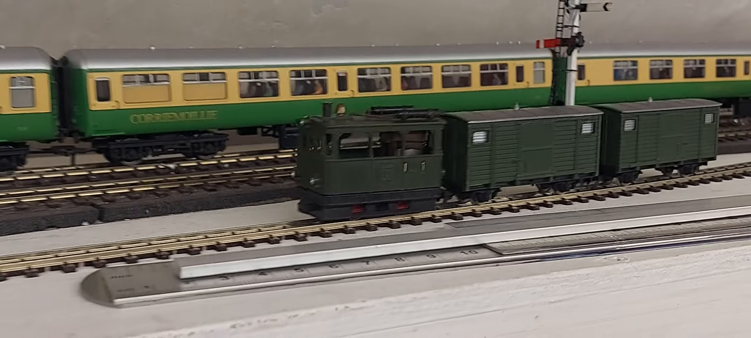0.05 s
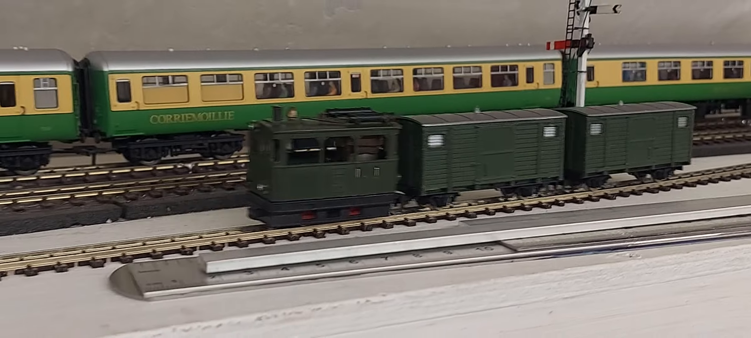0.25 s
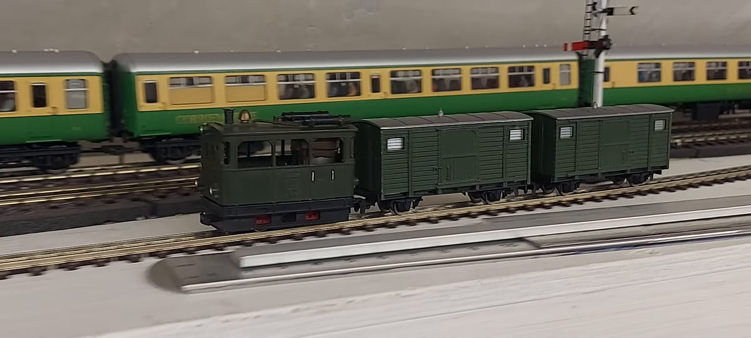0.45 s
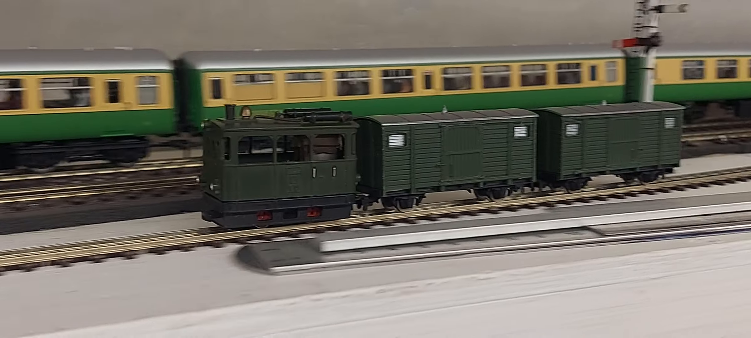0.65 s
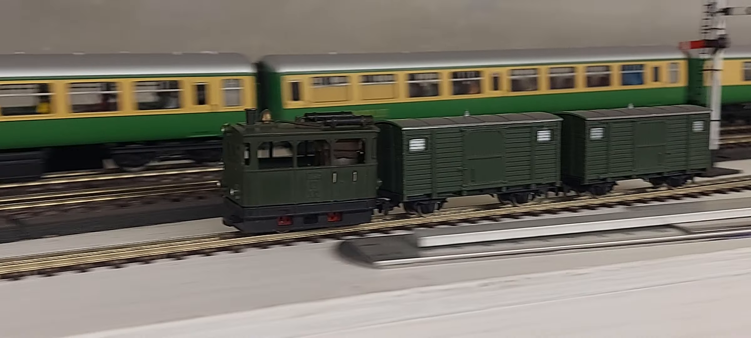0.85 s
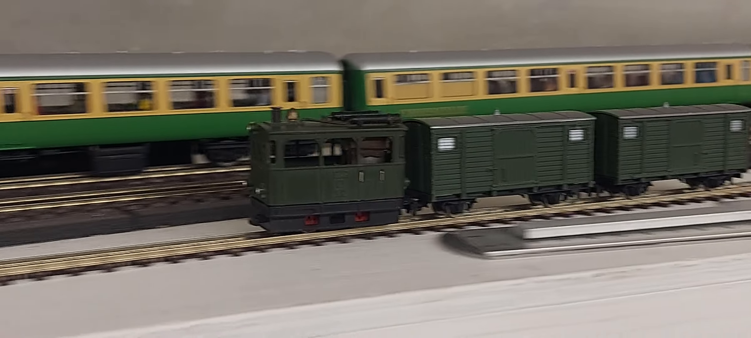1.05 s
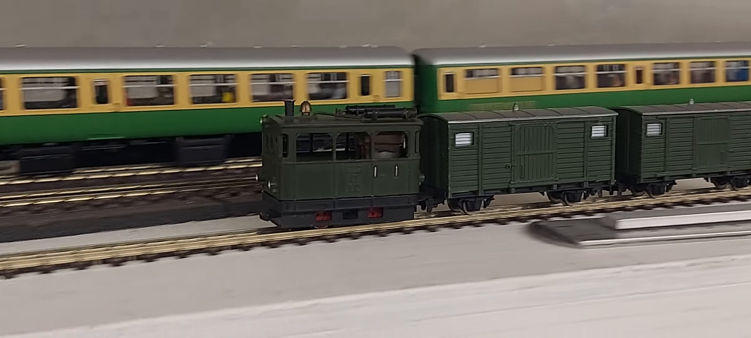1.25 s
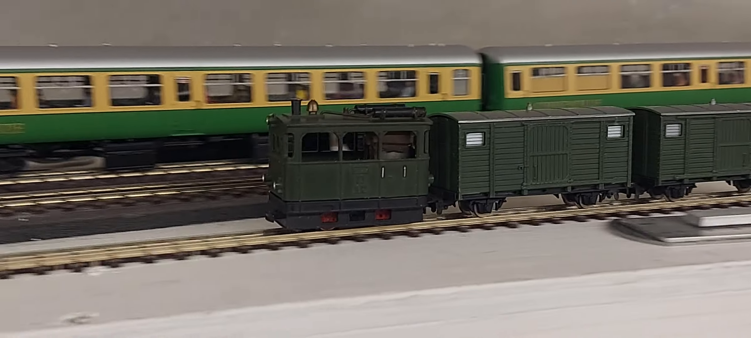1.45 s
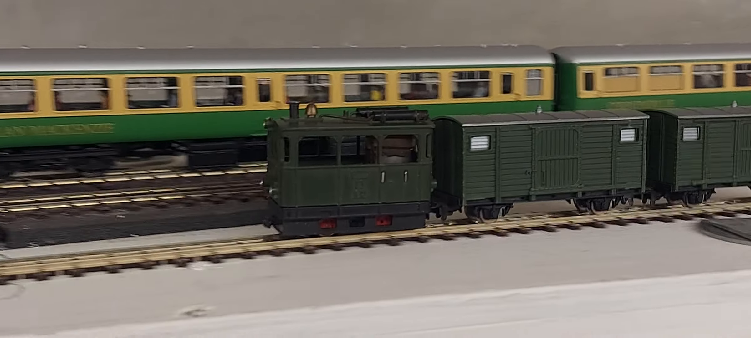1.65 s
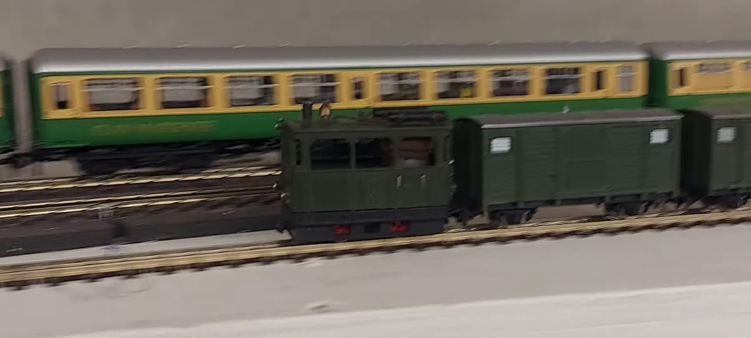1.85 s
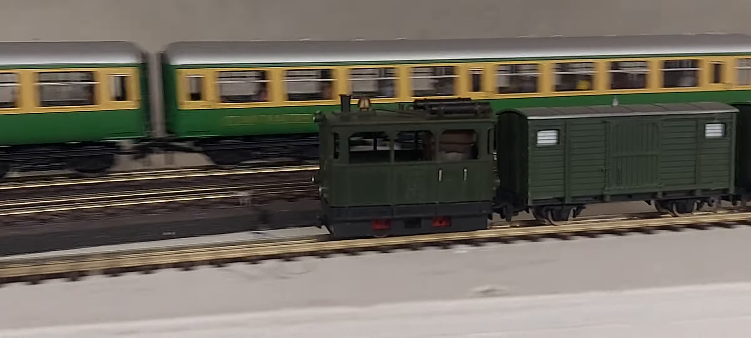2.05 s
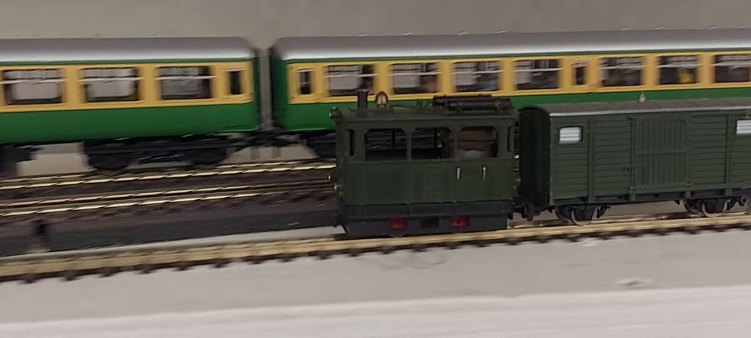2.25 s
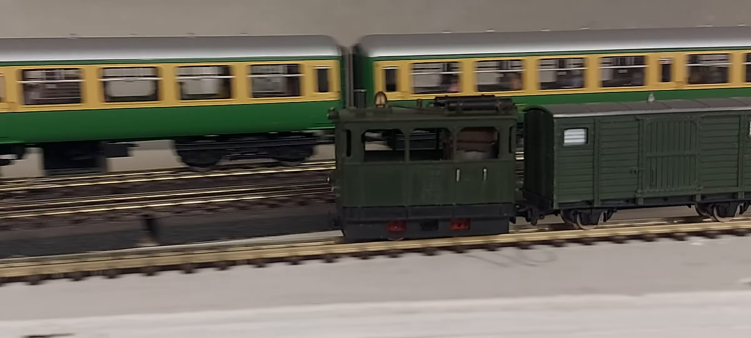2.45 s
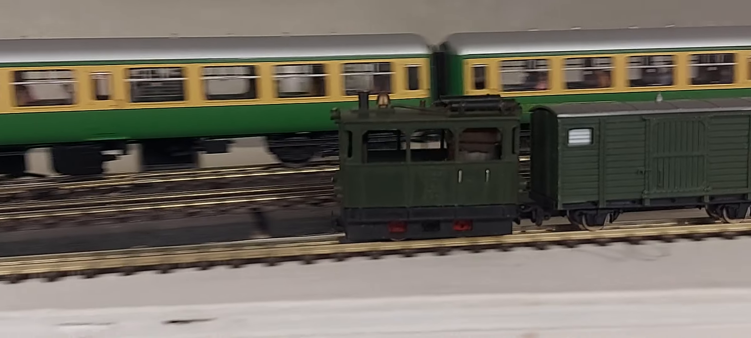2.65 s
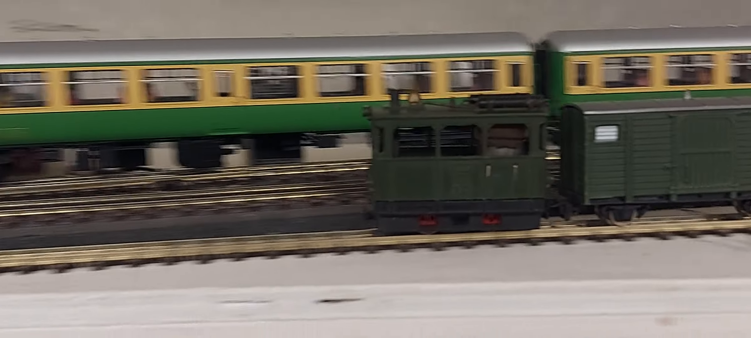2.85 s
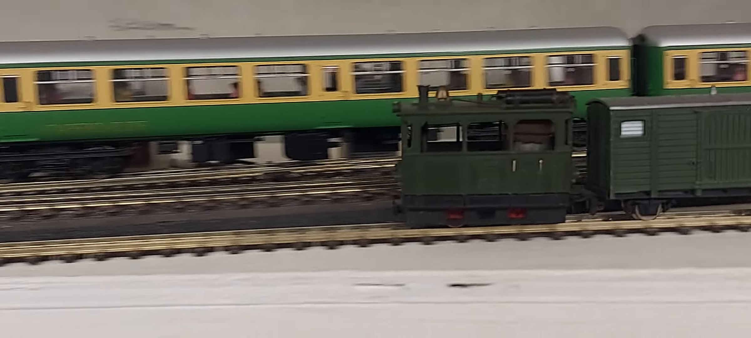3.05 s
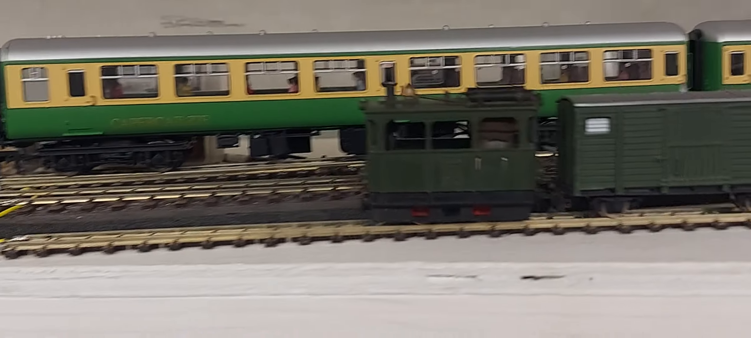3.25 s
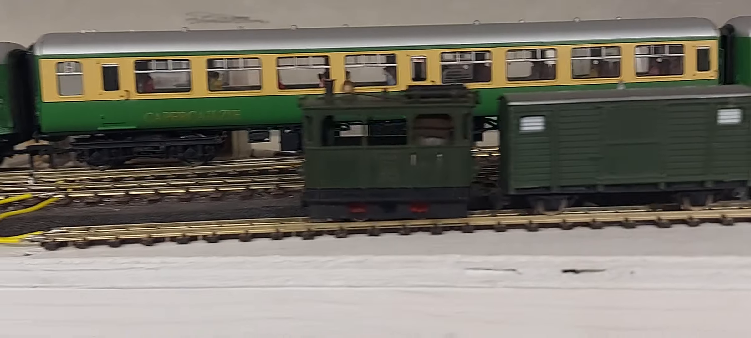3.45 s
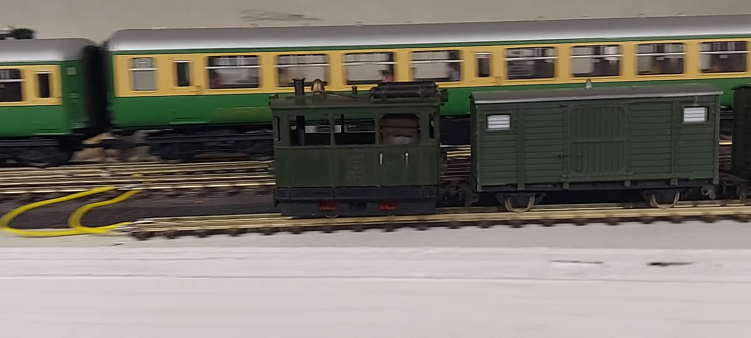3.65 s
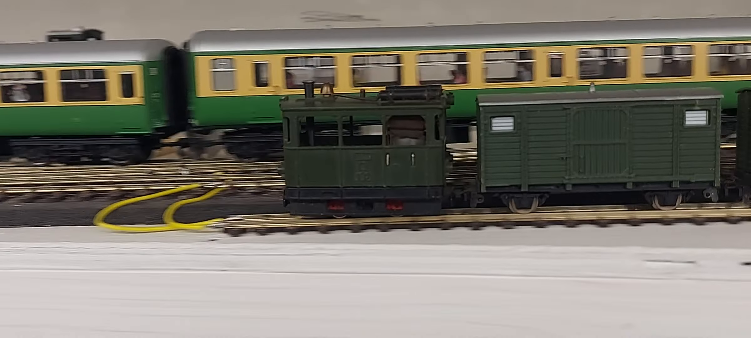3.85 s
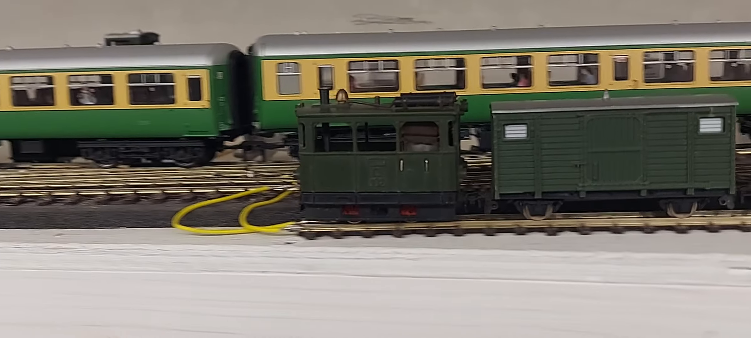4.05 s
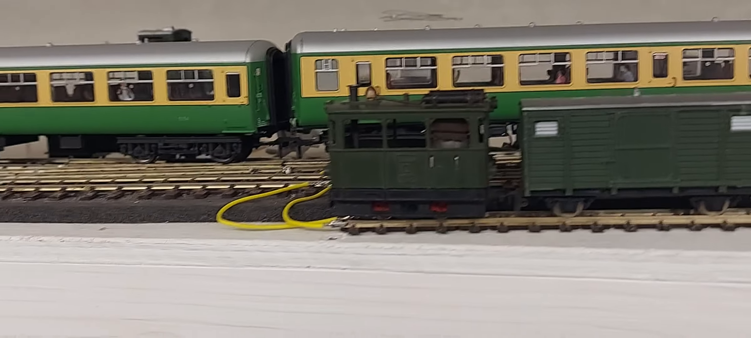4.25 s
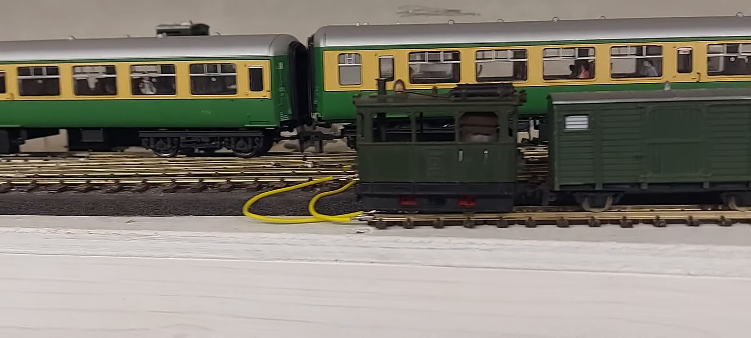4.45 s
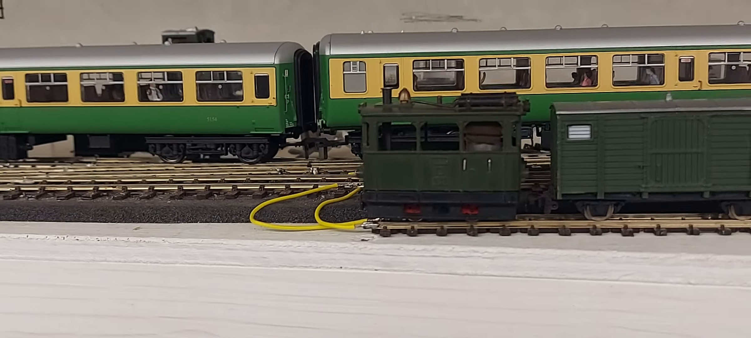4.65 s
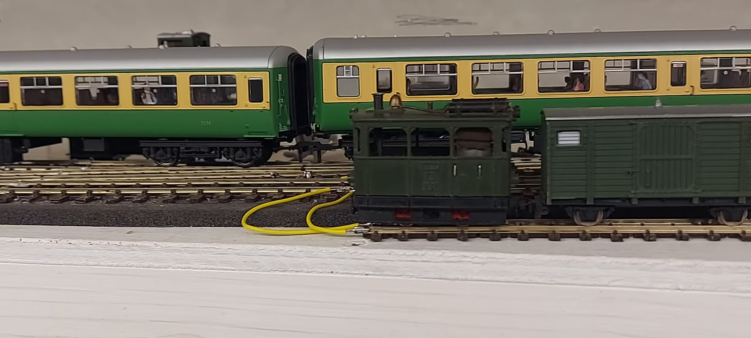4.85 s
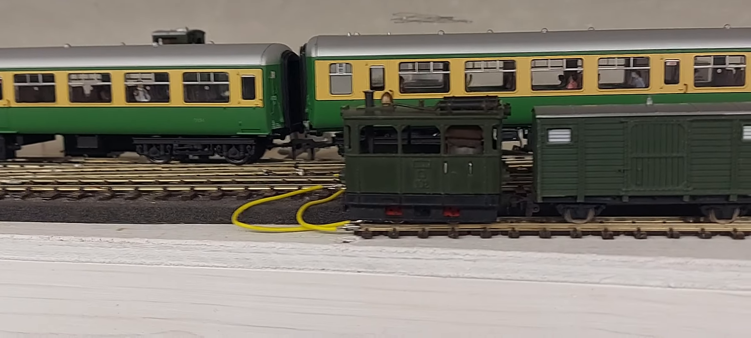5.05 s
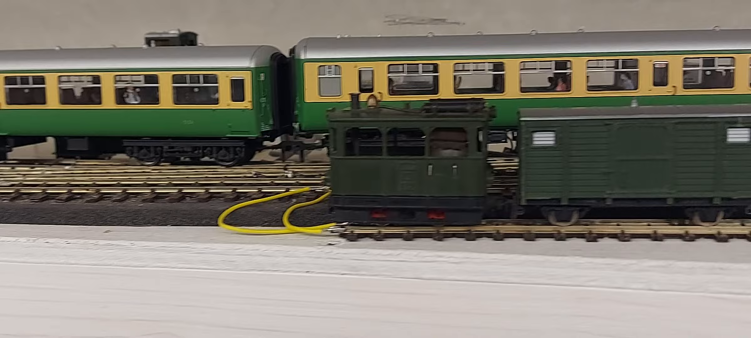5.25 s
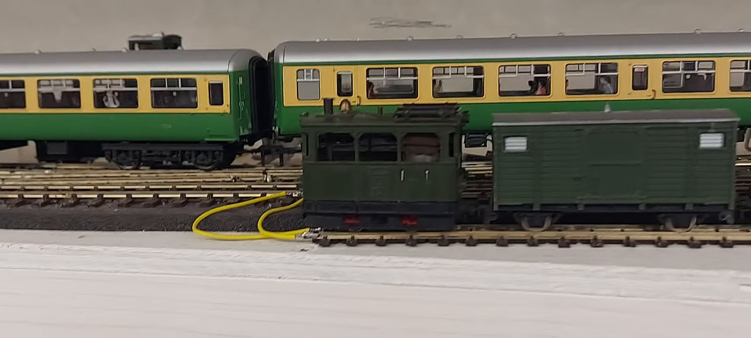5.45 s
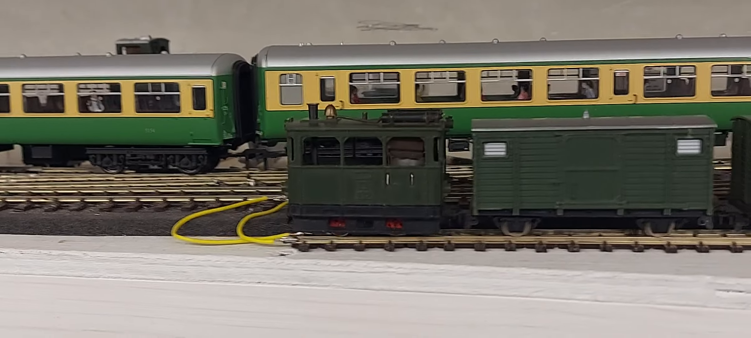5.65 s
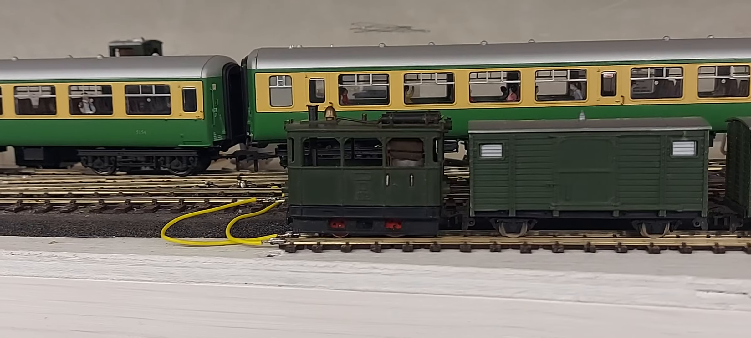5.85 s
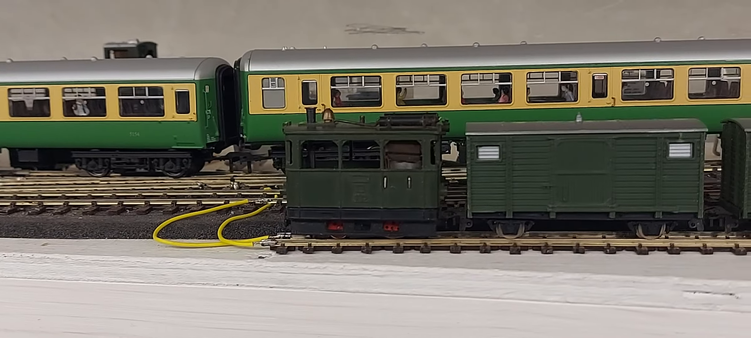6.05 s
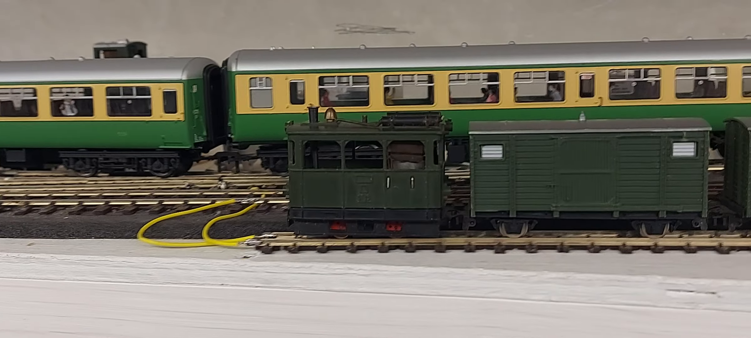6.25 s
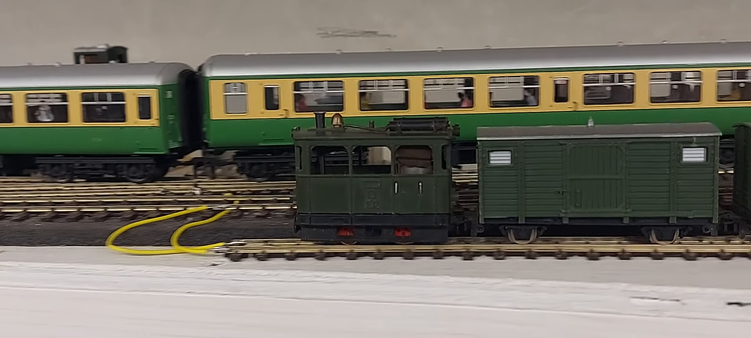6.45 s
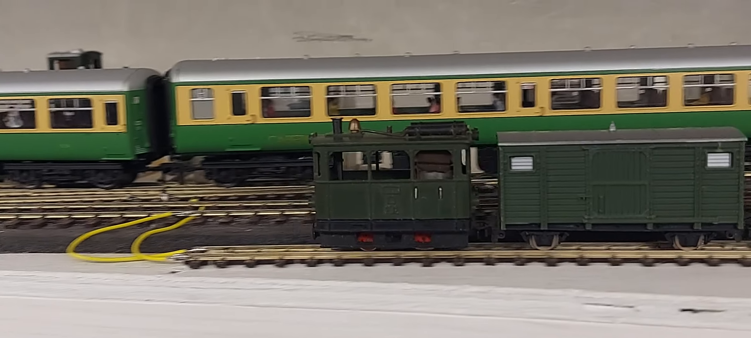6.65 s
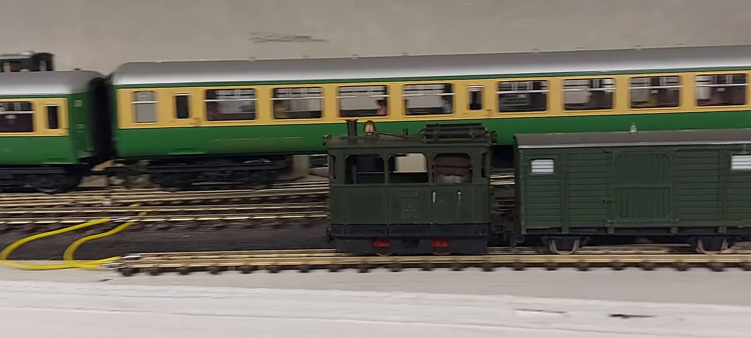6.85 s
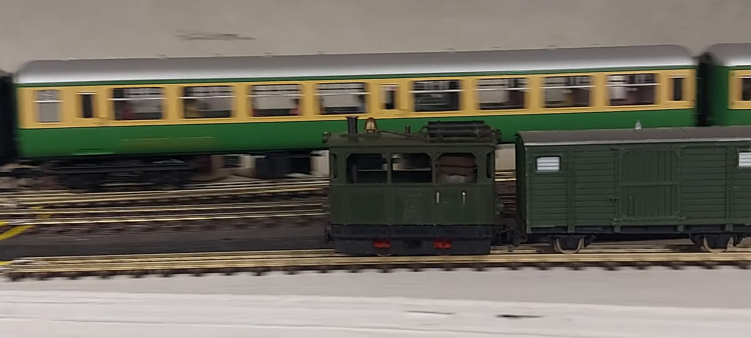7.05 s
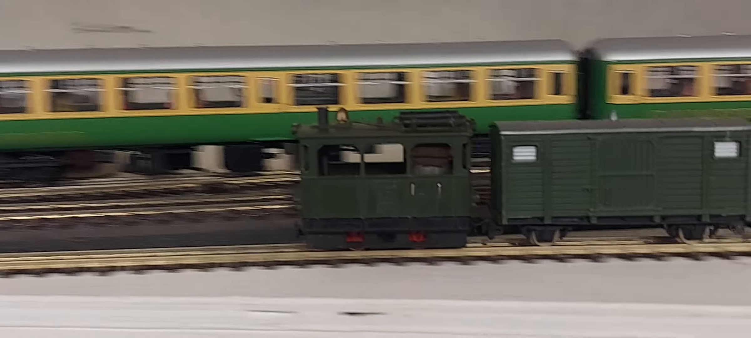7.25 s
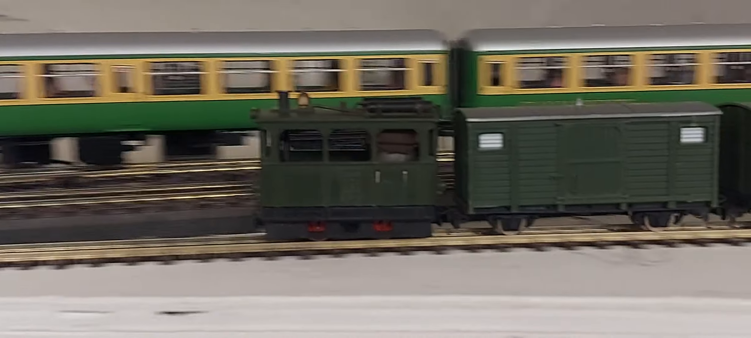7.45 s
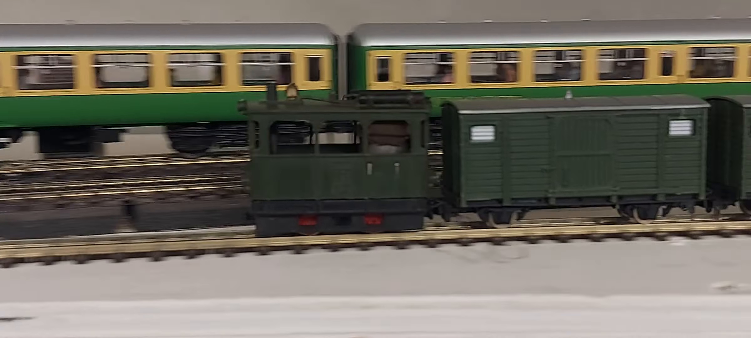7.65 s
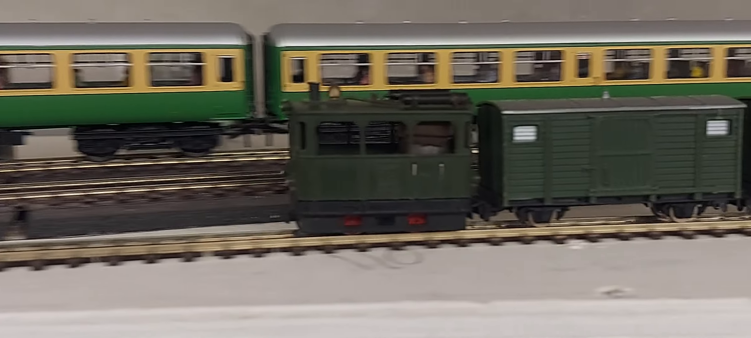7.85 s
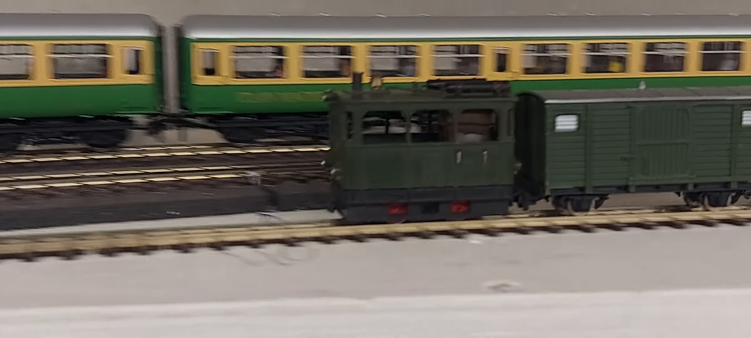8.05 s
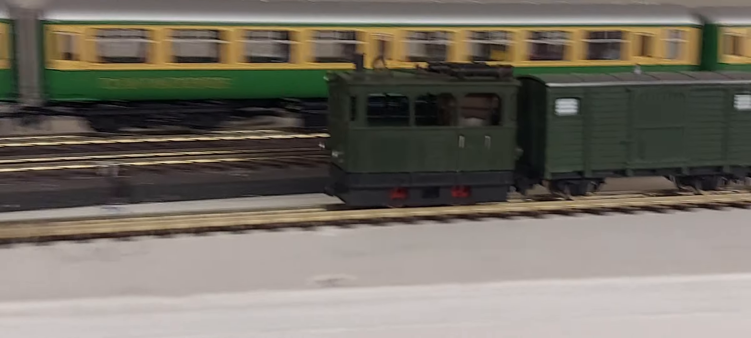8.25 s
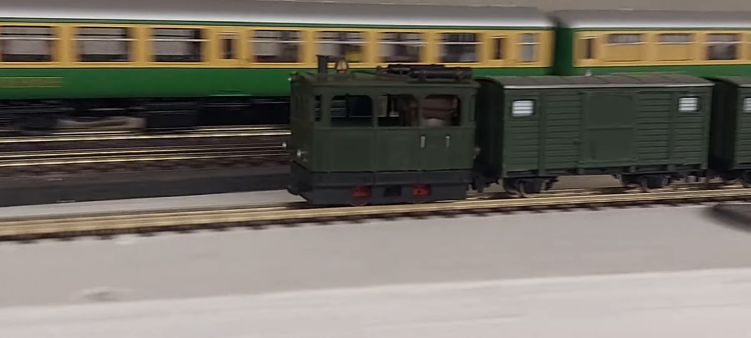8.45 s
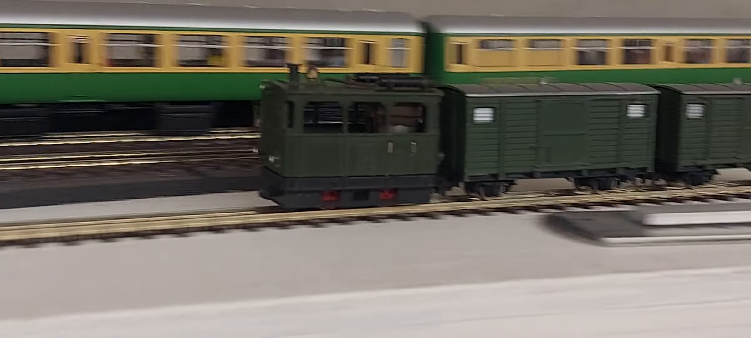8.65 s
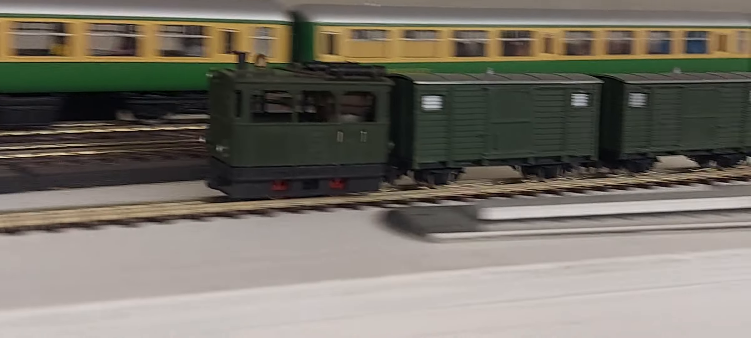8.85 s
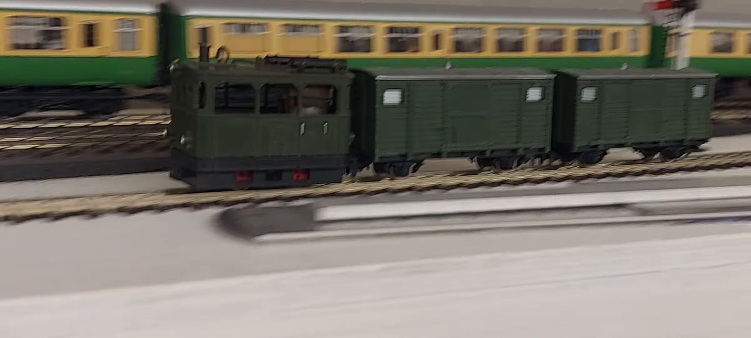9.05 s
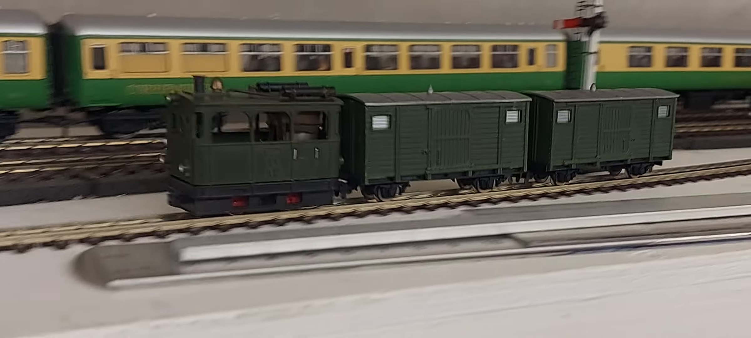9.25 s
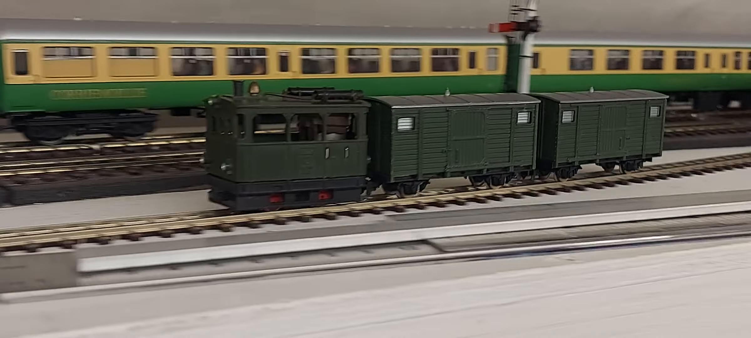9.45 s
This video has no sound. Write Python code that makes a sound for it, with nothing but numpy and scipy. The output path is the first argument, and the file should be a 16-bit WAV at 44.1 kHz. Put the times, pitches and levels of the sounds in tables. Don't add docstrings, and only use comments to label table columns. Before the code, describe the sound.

A model railway motor buzzes steadily at a low mains-like rate, bright and gritty, while wheels make the layout board boom in uneven lumps. It breaks into knocks and halts; only faint room hush remains, punctured by switch clicks, one much louder. Then a faint hum and scattered tiny gear ticks as it creeps off, building to an even harsher buzzing rattle to the end. Near, slightly roomy indoor capture.

```python
import sys
import numpy as np
from scipy import signal
from scipy.fft import rfft, irfft, next_fast_len
from scipy.io import wavfile
from scipy.ndimage import uniform_filter1d, map_coordinates

SR = 44100
rng = np.random.default_rng(int(sys.argv[2]) if len(sys.argv) > 2 else 0)


def natural_amplitude(level_db):
    exponent = np.asarray(level_db, float) / 20
    return 10 ** exponent


def to_wav(s):
    ch = np.atleast_2d(s).T
    pcm = np.round(np.clip(ch, -1, 1) * 32767)
    wavfile.write(sys.argv[1], SR, pcm.astype(np.int16))


N = 418950
T = np.arange(N) / SR
HZ = np.fft.rfftfreq(2 ** 14, 1 / SR)

# (time [s], shell rattle level [dB], brightness [dB])
EFFORT = [
    [(0.0, -43, -7.5), (0.55, -43.5, -3.5), (1.3, -41.5, -3.5), (2.1, -42, -3.5), (3.0, -40.5, -5),
     (3.8, -43.5, -6.5), (4.15, -47.5, -6.5), (4.23, -55, -12), (4.3, -75, -23)],
    [(5.58, -92, -13), (5.65, -66, -15.5), (6.1, -78, -13), (6.5, -57.5, -7), (6.9, -46.5, -3),
     (7.5, -43.5, -2), (8.3, -44, -1), (8.66, -42, -2), (9.5, -44.5, -3)],
]
# (time [s], level [dB])
STALL = [(5.555, -96), (5.59, -66), (5.62, -59), (5.645, -79), (5.7, -63), (5.85, -78), (6.35, -69),
         (7.3, -48.5), (7.9, -95)]
KICK_HZ, KICK_START = 100.064, .05
# (frequency [Hz], width [Hz], level [dB])
SHELL_OUT = [(452, 46, -12), (563, 160, -13), (666, 158, -11), (858, 180, -8), (903, 28, 4), (1073, 326, 0),
             (1370, 207, 3.5), (1613, 243, 10.5), (1937, 900, 2), (2690, 220, 0), (3284, 210, 0.5),
             (3617, 297, 2), (4198, 317, -0.5), (4436, 417, -1.5), (5020, 260, -9.5), (5650, 530, -11),
             (6510, 400, -12), (6930, 270, -13), (8310, 1100, -15.5), (11810, 1500, -14.5),
             (13000, 700, -18.5), (14000, 900, -30), (15500, 900, -19)]
SHELL_BACK = [(459, 39, -12.5), (564, 74, -15), (727, 160, -13.5), (938, 48, -4.5), (1118, 118, -3.5),
              (1434, 460, -7), (1647, 190, 0.5), (2130, 1180, -7.5), (2694, 95, 0), (3327, 260, -4),
              (3670, 285, -4.5), (4300, 370, -6.5), (4940, 170, -11.5), (5060, 860, -17), (5850, 390, -10),
              (6490, 340, -18.5), (7200, 280, -10.5), (7920, 330, -10), (8680, 880, -15),
              (11550, 1800, -17.5), (12900, 1300, -16.5), (15300, 1000, -20)]
# (frequency [Hz], width [Hz], level [dB])
BEARING = [(1100, 290, -24), (1660, 140, -13), (2715, 117, 0), (3580, 66, -29)]
# (frequency [Hz], width [Hz], level [dB])
BOARD_DEEP = [(88, 52, -14), (117, 7.8, 0.5), (146.6, 17, 0.5), (214, 21, -2)]
BOARD_UPPER = [(244.5, 24, -1), (273.6, 19.8, 5), (317.8, 21, -4.5), (353, 15, -3.5), (425, 40, -11.5)]
# (time [s], peak level [dB], ring [Hz], shell above it [dB])
SLAPS = [(4.118, -40, 6240, 3), (4.1485, -55, 5720, 3), (4.177, -49, 12700, 2), (4.1877, -46, 12300, 0),
         (4.1882, -31, 6240, 2.5), (4.199, -50, 12500, 0), (4.2178, -55.5, 6420, -7), (4.231, -33, 6700, 1),
         (5.668, -65, 8730, 13), (5.749, -47, 6400, 3), (5.8182, -56, 8610, 1), (5.857, -42, 12200, -4),
         (5.9367, -43.5, 13700, -5), (5.9658, -59, 12300, 16.5), (5.9888, -55, 8300, -1),
         (6.0186, -53, 6370, 6), (6.1446, -66, 8730, 0), (6.2244, -62, 12100, 8), (6.265, -58, 12200, 14.5),
         (6.322, -41.5, 12300, -1), (6.355, -37.5, 8020, -8), (6.3883, -36, 6300, -7),
         (6.4163, -49, 12800, -2), (6.4375, -38, 5630, -1), (6.465, -57, 5630, 7), (6.5173, -46, 12800, 9),
         (6.6152, -48, 12200, 1), (6.677, -39, 5630, -6), (6.8283, -43, 12500, -5)]
# (time [s], peak level [dB], ring time [s], ring [Hz], ring level [dB])
CLICKS = [(4.309, -64.5, 0.15, 4300, 6), (4.528, -64, .2, 3700, 0), (4.645, -92, .15, 560, 22),
          (4.929, -51, 0.29, 3860, -10), (4.968, -31.5, 0.16, 3100, -25), (5.116, -76.5, 0.14, 3830, 15),
          (5.416, -89, 0.065, 606, 7.5)]
# (frequency [Hz], density [dB per Hz])
CLICK_COLOUR = [(200, -8), (500, -16), (900, -18), (1500, -5), (2500, -3), (3800, -0.5), (4600, -3),
                (5600, -2.5), (7000, -8.5), (8800, -10.5), (10500, -13.5), (12200, -6), (14000, -23),
                (16000, -24)]
# (frequency [Hz], width [Hz], level [dB])
TABLE_MODES = [(86, 24, 13.5), (150, 65, -2.5), (245, 38, 1), (490, 110, -11), (790, 160, -2.5)]
# (frequency [Hz], density [dB per Hz])
QUIET = [(12, -50), (20, -24), (77, -5), (146, -4), (216, -10), (293, -2), (399, -11), (1120, -22),
         (1570, -21), (3250, -27), (4060, -21), (4940, -29), (7520, -30), (9800, -24), (11400, -20),
         (16000, -26)]
QUIET_DB = -78
# (frequency [Hz], left minus right [dB])
PORTS = [(60, -3), (110, -5.5), (200, -1.5), (380, -3.5), (700, -0.5), (1290, -9.5), (2380, -2),
         (4400, -5.5), (8120, -5), (11500, 0.5), (15000, -12)]
# (time [s], left minus right [dB])
PAN = [(0, 0), (2, 0), (4, 0.5), (5, 3), (6, -1), (7, 0), (9.5, 0.5)]
# (time [s], lag [ms])
PORT_LAG = [(0, .1), (1, .097), (2.3, .11), (4.2, .104), (5.6, .1), (6.8, .077), (8.2, .077), (8.6, .096),
            (9.5, .096)]
ROOM_T60_S, ROOM_DB, NEARBY_S, NEARBY_DB = .16, -7, 0.002, -6
ROOM_STEP_S = .3
# (time [s], peak level [dB])
JOLTS = [(5.5867, -58), (5.5962, -53), (5.6062, -53), (5.6156, -53), (5.6481, -56), (5.668, -54),
         (5.688, -57), (5.6965, -54), (5.715, -54), (5.7474, -57), (5.7853, -61), (5.8057, -48.5),
         (5.8454, -52), (5.8576, -46), (5.906, -58), (5.9263, -50), (5.9374, -48), (5.966, -48),
         (6.0187, -53), (6.0462, -57), (6.0861, -57), (6.1459, -69), (6.1883, -66), (6.2058, -66),
         (6.2352, -61), (6.2657, -52), (6.2956, -55), (6.3245, -58), (6.3355, -55), (6.3654, -48),
         (6.3749, -46), (6.3873, -42), (6.4283, -50), (6.4383, -48), (6.4647, -51), (6.4946, -50),
         (6.5153, -42)]
APART = (.34, .42, .6)
TOP_HZ, CRUISE_DB = 15840, -43
GEAR_DB = (0.5, 0.04)
GEAR_PER_BRIGHT = 0.11
KICK_DEPTH, KICK_DEPTH_PER_DB, KICK_DEPTH_WANDER = .62, .06, .1
DROPOUT = 6.126, .011, -20
ROLL_DB, ROLL_PER_EFFORT, ROLL_CREEP_DB, DEEP_DB = -53, 0.22, -62.5, -6.5
WHEELS_STOP_S, WHEELS_START_S, WHEELS_DB_PER_S = 4.243, 5.71, 161
# (centre [s], half length [s], boost [dB], lowest modes' boost [dB])
HOLLOW = [(0.0, 0.0093, 20, -3), (0.41, 0.045, 3.5, 2), (0.56, 0.02, 10, 4.5), (0.676, 0.13, 9.5, 2),
          (1.093, 0.038, 8.5, 8), (1.224, 0.063, 12, -7), (1.404, 0.09, 11.5, 0.5), (1.775, 0.042, 4.5, 2),
          (2.035, 0.086, -4, -4), (2.554, 0.065, 2.5, -5), (3.14, .12, 1, 2), (3.519, .15, 2, 1),
          (3.78, .12, 1, -1), (4.1, 0.14, -1.5, -2), (5.9, 0.27, -3.5, -6), (6.3, 0.011, 5.5, -1),
          (6.5, 0.055, 6.5, 2), (6.914, 0.11, 12.5, 1.5), (7.22, 0.079, 8.5, 9), (7.736, 0.18, 8.5, 4),
          (8.098, 0.16, 0, 5), (8.425, 0.096, 8.5, 1), (8.74, 0.11, 15.5, 2), (8.97, 0.036, 4, -2),
          (9.07, .06, -1, 3), (9.312, 0.2, 7.5, 5)]
# (time [s], level [dB])
THUMPS = [(4.31, -64), (4.527, -62), (4.646, -69), (4.929, -57), (4.968, -50.5), (4.994, -54.5),
          (5.03, -64), (5.416, -90)]
KICK_NARROWS, CHASSIS_PER_HOLLOW, HARD_PUSH_DB = .55, .45, -50
CHASSIS_DB = (-18, -15.5)
# (time [s], peak level [dB])
HITS = [(0.0902, -32.5), (0.1111, -34), (0.2708, -37.5), (0.3401, -36), (0.4289, -34), (0.4504, -40),
        (0.4893, -38), (0.5008, -32.5), (0.5397, -34), (0.5581, -35), (0.5706, -31), (0.6499, -41),
        (0.6684, -35.5), (0.6809, -32.5), (0.7003, -34), (0.7402, -32.5), (0.8096, -35),
        (0.8215, -31.5), (0.9103, -31.5), (1.069, -38), (1.2391, -39.5), (1.4486, -34), (1.4795, -32),
        (1.5594, -35), (1.5703, -36), (1.73, -38.5), (1.7589, -33.5), (1.8188, -36), (2.0298, -36),
        (2.0393, -35), (2.0497, -33), (2.0602, -31.5), (2.1605, -30), (2.169, -32), (2.1899, -32),
        (2.1994, -34), (2.2094, -35.5), (2.2288, -33), (2.3306, -38), (2.3386, -34.5), (2.4887, -39.5),
        (2.5102, -36.5), (2.5586, -37), (2.5686, -37), (2.6085, -41.5), (2.6189, -34.5), (2.6404, -34),
        (2.6993, -42), (2.7092, -34.5), (2.7601, -31), (2.9193, -33.5), (2.9881, -32), (2.9881, -34),
        (3.0684, -34), (3.1288, -32.5), (3.2081, -40.5), (3.2286, -36), (3.5369, -35), (3.7883, -35),
        (3.9878, -35),
        (7.027, -34.5), (7.3348, -29.5), (7.4371, -32.5), (7.466, -27), (7.5164, -32.5),
             (7.5449, -37.5), (7.5962, -46), (7.5962, -29.5), (7.7155, -31.5), (7.7359, -30.5),
             (7.7763, -30), (7.8053, -35.5), (7.8372, -43), (7.8372, -30.5), (7.8961, -31), (7.9559, -29.5),
             (8.0148, -29.5), (8.0737, -31), (8.1061, -29), (8.165, -35), (8.165, -29), (8.2024, -30),
             (8.2353, -31), (8.3236, -31), (8.4049, -32), (8.4453, -30.5), (8.4847, -34), (8.5127, -35),
             (8.5441, -35), (8.5441, -31.5), (8.6134, -34), (8.6838, -31), (8.7167, -33), (8.7237, -33),
             (8.806, -37), (8.8559, -41.5), (8.8634, -34), (8.9262, -46), (8.9342, -37), (8.9427, -31),
             (8.9542, -36.5), (8.9951, -39), (9.022, -37), (9.034, -33), (9.0654, -32.5), (9.0734, -32.5),
             (9.0933, -38), (9.1188, -37), (9.1442, -31), (9.1442, -30.5), (9.1956, -31), (9.2245, -36),
             (9.2739, -28.5), (9.2834, -36), (9.3358, -30.5), (9.3448, -28.5), (9.3747, -30.5),
             (9.4256, -31), (9.4256, -29), (9.465, -30.5)]
HIT_FROM_DB, HIT_PER_DB = -37.5, 0.4621
# (first station [dB], third station [dB], later stations [dB] ..); the second is the reference
TURN_OUT = [(-1.5, 1, 1.5, 2), (-1, -1, -4, -3.5), (0.5, -1.5, -3, -3.5), (-1, 0, -1.5, 0),
            (-1, 0, -1.5, -0.5), (0.5, 0, 1, 1), (1, 1.5, -1, 5), (-1, 1.5, 1.5, 1), (-1.5, 0, 1, -1),
            (1.5, 0, 4, 2.5), (1, -2, -1, -1), (-4, 0.5, -5.5, -3.5), (2, 2, -0.5, 0.5), (1, -2.5, -3, 0.5),
            (3.5, 1.5, 1.5, 0.5), (1.5, -0.5, 1.5, 0.5), (3, 3.5, 0.5, 2.5), (-0.5, 1.5, 3, 7.5),
            (2.5, -1.5, -1.5, 4), (-3, 2, 5, 2)]
TURN_BACK = [(1, 4, 2), (-2.2, 0.5, 0.5), (-1.7, 0.5, -1.5), (2, 3, 1), (0.3, -0.5, 0.5), (2, -0.5, -0.5),
             (-0.6, 1, -0.5), (-1, 0, 1), (-2, -3, 0.5), (-0.5, 5, 0.5), (-3, 0, -10), (0, 2, 2),
             (5, 5.5, 9), (0.5, 1.5, -1.5), (-3.5, -2, 0.5), (0, 1.5, -0.5), (1.5, 1, 1.5), (0.5, -0.5, -3),
             (-2.5, 0.5, -2)]
# (time [s], ..)
TURN_S = [(0.4, 1.2, 2.05, 2.9, 3.7), (6.9, 7.6, 8.4, 9.2)]
WHINE_HZ, WHINE_DB = 8954, -104
# (time [s], factor on depth)
GRIP = [(0, 1.15), (0.75, 1.1), (1.4, 0.99), (2.2, 1.45), (3.4, 1.3), (4.1, 1.2), (5.7, 0.55), (6.2, 0.47),
        (6.5, 1.34), (7.1, 1.6), (7.6, 0.91), (8.2, 1.07), (8.7, 0.96), (9.5, 0.66)]
# (time [s], peak level [dB])
COASTING = [(4.0572, -33), (4.0684, -35), (4.0766, -28), (4.0974, -31), (4.1174, -32), (4.1475, -38),
            (4.1574, -36), (4.168, -35), (4.1762, -29), (4.1884, -33), (4.1994, -36), (4.2074, -41),
            (4.2174, -45), (4.2295, -37), (4.2374, -43), (4.2484, -45), (4.2694, -48)]
# (centre [s], half length [s], boost [dB])
SPANS = [(1.08, 0.039, 3.5), (1.55, .1, -1), (2.75, 0.14, 7), (3.1, 0.17, 5), (3.75, 0.13, 7.5),
         (4.13, 0.05, 2.5), (6.2, .4, -2), (7.3, 0.092, 4), (7.65, 0.18, 5), (8.0, 0.11, 0.5),
         (9.3, 0.14, 1)]
KNOCK_DB, KNOCK_JITTER_S = 17, .0004
GEARS_SLACKEN = 4.27, .045, -6


def level(x, db=0):
    return x * natural_amplitude(db) / np.sqrt(np.mean(x ** 2))


def through(x, *gains):
    size = next_fast_len(x.shape[-1] + SR // 4)
    spectrum, hz = rfft(x, size), np.fft.rfftfreq(size, 1 / SR)
    out = [irfft(spectrum * np.interp(hz, HZ, gain), size)[..., :x.shape[-1]] for gain in gains]
    return out if len(out) > 1 else out[0]


def modes(table, lo=0, hi=SR, loose=False):
    each = []
    for k, (f, width, db) in enumerate(table):
        if lo <= f < hi:
            damping = 1j * HZ * width
            each.append((-1) ** k * natural_amplitude(db) * damping / (f ** 2 - HZ ** 2 + damping))
    return np.sqrt(np.sum(np.abs(each) ** 2, axis=0)) if loose else sum(each)


def steep(lo_hz, hi_hz):
    return 1 / np.sqrt((1 + (lo_hz / (HZ + 1)) ** 6) * (1 + (HZ / hi_hz) ** 6))


def colour(table):
    hz, db = np.transpose(table)
    return np.interp(np.log(HZ + 1), np.log(hz + 1), db)


def columns(table):
    s, *rest = np.transpose(table)
    gate = uniform_filter1d(1. * (T >= s[0]) * (T <= s[-1]), size=441, mode="nearest")
    return gate, [np.interp(T, s, c) for c in rest]


def walk(rate):
    k = int(SR / rate)
    held = np.repeat(rng.standard_normal(N // k + 1), k)
    return 0.54 * uniform_filter1d(uniform_filter1d(held, k), k)[:N]


def swell(centre_s, half_s, db):
    return db * np.exp(-.5 * ((T - centre_s) / half_s) ** 2)


def hollow(order):
    t = T[::64]
    return np.interp(T, t, sum(row[order] * np.exp(-.5 * ((t - row[0]) / row[1]) ** 2) for row in HOLLOW))


def kick_sizes():
    sizes = (0.93 * rng.standard_normal(N // 400) - 0.3).clip(-2, 0.7)
    s, db = np.transpose(HITS)
    sizes[np.round(KICK_HZ * s - KICK_START).astype(int) + 1] = HIT_PER_DB * (db - HIT_FROM_DB)
    return sizes


def kick_train(jitter_s, scatter_db):
    count = int(KICK_HZ * N / SR) - 1
    chance = rng.standard_normal((count, 2)).T
    at = (np.arange(count) + KICK_START) / KICK_HZ + jitter_s * chance[0]
    knocks = np.zeros(N)
    knocks[np.clip(at * SR, 0, N - 1).astype(int)] = natural_amplitude(scatter_db * chance[1])
    return knocks


def chatter(depth, kicks, impacts, peak, sharp, scatter_db, grain_db, apart):
    turn = KICK_HZ * T - KICK_START - peak + 1.5
    cycle = turn.astype(int)
    width = sharp * (1.25 - KICK_NARROWS * depth)
    push = np.exp(-.5 * ((turn % 1 - .5) / width) ** 2) * natural_amplitude(scatter_db * kicks)[cycle]
    depth = np.clip(depth, 0, 1)
    both, own = rng.standard_normal((2, N))
    grains = natural_amplitude(grain_db * impacts).repeat(32)[:N]
    return ((1 - depth) * .5 + depth * push) * grains * np.array([both + apart * own, both - apart * own])


def turning(x, shell, turn, weights, lo, hi, edges):
    out = np.zeros_like(x)
    shifts = np.insert(np.array(turn, float), 1, 0, axis=1).T
    for w, shift in zip(weights, shifts):
        near = np.flatnonzero(w)
        at = slice(near[0], near[-1] + 1)
        shifted = [(f, width, db + d) for (f, width, db), d in zip(shell[3:], shift)]
        gain = modes(shifted, lo, hi, loose=hi == SR) * edges
        out[:, at] -= w[at] * through(x[:, at], gain)
    return level(out)


def motor():
    out, uneven, flicker = np.zeros((2, N)), 0.14 * walk(8.7), walk(25)
    boom_db = CHASSIS_PER_HOLLOW * hollow(order=2)
    slower_db = -4 - columns(EFFORT[0] + EFFORT[1])[1][1]
    depth = KICK_DEPTH + KICK_DEPTH_PER_DB * slower_db + KICK_DEPTH_WANDER * walk(5)
    depth = np.clip(depth, 0, 1.1)
    blows = kick_sizes(), rng.exponential(size=N // 32 + 1).clip(0, 4)
    grip = np.interp(T, *np.transpose(GRIP))
    knocks = natural_amplitude(KNOCK_DB) * grip * depth * kick_train(jitter_s=KNOCK_JITTER_S, scatter_db=1.5)
    low = knocks + chatter(0.66 * grip * depth, *blows, peak=-0.02, sharp=0.29, scatter_db=0.64,
                           grain_db=0.3, apart=APART[0])
    gear = 0.18 * knocks + chatter(0.63 * np.sqrt(grip) * depth, *blows, peak=0.12, sharp=0.2,
                                   scatter_db=1.8, grain_db=1.5, apart=APART[1])
    fizz = chatter(0.55 * grip * depth, *blows, peak=0.084, sharp=0.2, scatter_db=1.5,
                   grain_db=2.0, apart=APART[2])
    brush = chatter(0.68 * depth, *blows, peak=0.12, sharp=0.17, scatter_db=3.2,
                    grain_db=1.84, apart=APART[2])
    shells, turns = (SHELL_OUT, SHELL_BACK), (TURN_OUT, TURN_BACK)
    halves = slice(0, N // 2), slice(N // 2, N)
    for k, at in enumerate(halves):
        shell, turn_s = shells[k], TURN_S[k]
        gate, (db, brush_db) = columns(EFFORT[k])
        weights = [np.interp(T[at], turn_s, w) for w in np.eye(len(turn_s))]
        sides = shell, turns[k], weights
        parts = turning(low[:, at], *sides, lo=850, hi=2400, edges=steep(510, 2800))
        chassis_db = CHASSIS_DB[k] + 0.25 * (db + 44.0) + boom_db
        parts += level(through(low[:, at], modes(shell, hi=850) * steep(460, 820))) * natural_amplitude(chassis_db)[at]
        gear_db = GEAR_DB[k] + GEAR_PER_BRIGHT * brush_db + swell(*GEARS_SLACKEN) + 0.33 * uneven
        parts += turning(gear[:, at], *sides, lo=2400, hi=5600, edges=steep(2300, 7900)) * natural_amplitude(gear_db)[at]
        hard_db = brush_db - 2.5 + 0.54 * uneven + 2.5 * flicker
        parts += turning(brush[:, at], *sides, lo=5000, hi=10000, edges=steep(4600, 8600)) * natural_amplitude(hard_db)[at]
        fizz_db = brush_db - 5.5 + 0.5 * uneven + 1.4 * flicker
        parts += turning(fizz[:, at], *sides, lo=10000, hi=SR, edges=steep(9500, 16000)) * natural_amplitude(fizz_db)[at]
        out[:, at] = (gate * natural_amplitude(db + 3.5 + 0.13 * uneven + swell(*DROPOUT)))[at] * parts
    return out


def board():
    effort_db = np.maximum(columns(EFFORT[0] + EFFORT[1])[1][0], ROLL_CREEP_DB)
    still_s = np.clip(np.minimum(T - WHEELS_STOP_S, WHEELS_START_S - T), 0, None)
    db = ROLL_DB + ROLL_PER_EFFORT * (effort_db - CRUISE_DB) - WHEELS_DB_PER_S * still_s
    shake = rng.standard_normal(N) * natural_amplitude(2.6 * walk(30))
    deep = level(through(shake, modes(BOARD_DEEP) * steep(44, 290)))
    main_gain = modes(BOARD_UPPER, hi=300) * steep(200, 360)
    high_gain = modes(BOARD_UPPER, lo=300) * steep(220, 430)
    main, high = through(shake, main_gain, high_gain)
    upper = level(main + high * natural_amplitude(sum(swell(*row) for row in SPANS)))
    deep_db = DEEP_DB + hollow(order=3) + 1.3 * walk(6.3)
    return natural_amplitude(db) * (natural_amplitude(hollow(order=2)) * upper + natural_amplitude(deep_db) * deep)


def quiet():
    mid, side = through(rng.standard_normal((2, N)), natural_amplitude(colour(QUIET)))
    side = through(side, HZ / (HZ + 300) + 5.0 * steep(0.89, 45))
    hush = level(np.array([mid + side, mid - side]) * natural_amplitude(1.1 * walk(4.1)), QUIET_DB + 3.0)
    return hush + natural_amplitude(WHINE_DB + 4.0) * np.sin(2 * np.pi * WHINE_HZ * T + 3 * walk(40))


def surroundings(x):
    step, t = int(ROOM_STEP_S * SR), T[:SR // 6]
    out = np.zeros((2, N + 3 * step + SR))
    padded = np.pad(x, ((0, 0), (step, 3 * step)))
    fade = np.sin(np.pi * np.arange(2 * step) / (2 * step)) ** 1.806
    for i in range(0, N + step, step):
        near, far = rng.standard_normal((2, 2, len(t)))
        near = np.diff(near * np.exp(-t / NEARBY_S), prepend=0)
        far = far * (t > .004) * np.exp(-np.log(1000) * t / ROOM_T60_S)
        path = np.zeros((2, len(t)))
        for echo, db in ((near, NEARBY_DB), (far, ROOM_DB)):
            path += natural_amplitude(db) * echo / np.sqrt(np.sum(echo ** 2, axis=1, keepdims=True))
        path[:, 0] += 1
        heard = signal.fftconvolve(fade * padded[:, i:i + 2 * step], path, axes=1)
        out[:, i:i + 2 * step + len(t) - 1] += heard
    return out[:, step:step + N] * natural_amplitude(-2.5)


def rattled(table, gain_db, size):
    hits = np.zeros(N)
    s, db = np.transpose(table)
    hits[(s * SR).astype(int)] = natural_amplitude(db + gain_db)
    return 0.5 * hits + 0.15 * np.convolve(hits, np.hanning(size))[:N] * rng.standard_normal(N)


def bearing():
    gate, (db,) = columns(STALL)
    ring = modes(BEARING) * steep(900, 3300)
    shell_ring = modes(SHELL_OUT, lo=970, hi=3000) * steep(900, 3300)
    steady = level(through(kick_train(jitter_s=.0005, scatter_db=0.0), ring))
    steady = gate * natural_amplitude(db + 4.0 + swell(*DROPOUT)) * steady
    jolts = through(rattled(JOLTS, gain_db=41.5, size=110), ring)
    return steady + jolts + through(rattled(COASTING, gain_db=20.0, size=90), shell_ring)


def slaps():
    out, cracks, knocks, t = np.zeros(N), np.zeros(N), np.zeros(N), T[:600]
    for (s, db, hz, shell_db), noise in zip(SLAPS, rng.standard_normal((len(SLAPS), 600))):
        i = int(s * SR)
        out[i:i + 600] += natural_amplitude(db - 1.5) * np.sin(2 * np.pi * hz * t) * np.exp(-t / 0.00068)
        cracks[i:i + 600] += natural_amplitude(db + 10.0) * noise * np.exp(-t / .0015)
        knocks[i] = natural_amplitude(db + shell_db + 29.0)
    out += through(cracks, modes(SHELL_BACK, lo=4100) * steep(4500, 18000))
    return out + through(knocks, modes(SHELL_BACK, hi=4100) * steep(760, 7300))


def clicks():
    wash, thump, t = np.zeros((2, N)), np.zeros((2, N)), T[:SR // 2]
    for (s, db, t60, ring_hz, ring_db), noise in zip(CLICKS, rng.standard_normal((len(CLICKS), 3, SR // 2))):
        i = int(s * SR)
        fade = (1 - np.exp(-t / 0.00047)) * np.exp(-np.log(1000) * t / t60)
        snap = noise[:2] + 0.36 * noise[2]
        ring = signal.lfilter(*signal.iirpeak(ring_hz, 4, SR), snap)
        wash[:, i:i + SR // 2] += natural_amplitude(db) * fade * (snap + natural_amplitude(ring_db) * ring)
    for (s, db), noise in zip(THUMPS, rng.standard_normal((len(THUMPS), SR // 2))):
        i = int(s * SR)
        hard = natural_amplitude([[0], [min(db - HARD_PUSH_DB, 0)]])
        thump[:, i:i + SR // 2] += natural_amplitude(db + 25.5) * hard * noise * t / 0.029 * np.exp(1 - t / 0.014)
    middle = modes(TABLE_MODES, lo=120, hi=600) * steep(70, 2000)
    outer = modes(TABLE_MODES, hi=120) * steep(62, 900) + modes(TABLE_MODES, lo=600)
    wash = through(wash, natural_amplitude(colour(CLICK_COLOUR) + 9.5) * steep(70, 20000))
    return wash + through(thump[0], middle) + through(thump[1], outer)


def scene():
    rumble = board()
    heard = surroundings(motor() + bearing() + slaps() + natural_amplitude(-1.5) * rumble) + 0.27 * rumble
    late = np.arange(N) - np.interp(T, *np.transpose(PORT_LAG)) * SR / 1000
    heard[1] = map_coordinates(heard[1], [late], order=5, mode="nearest")
    pan_db = np.interp(T, *np.transpose(PAN))
    return heard * natural_amplitude(np.array([pan_db, -pan_db]) / 2) + clicks() + quiet()


def roll_off(x):
    return signal.sosfilt(signal.butter(12, 17080, fs=SR, output="sos"), x)


def record(dry):
    ports = []
    for port, side in zip(dry, (1, -1)):
        ports.append(through(port, natural_amplitude(side * colour(PORTS) / 2) * (HZ < TOP_HZ)))
    return roll_off(np.array(ports))


dry = scene()
out = record(dry)
to_wav(out)
```